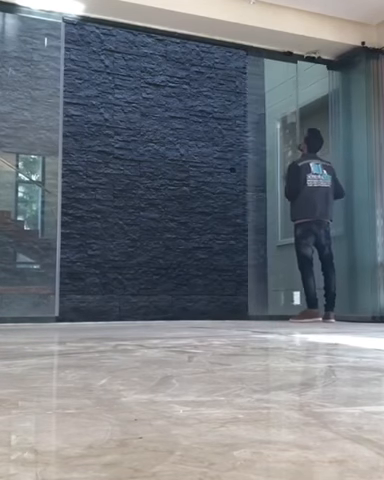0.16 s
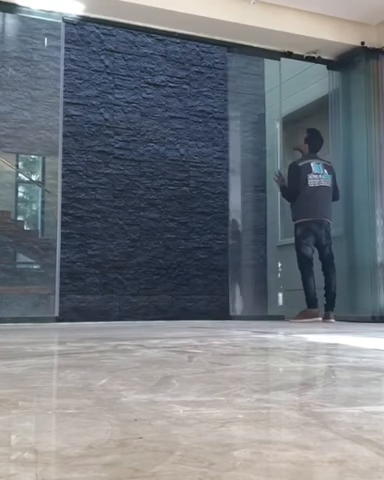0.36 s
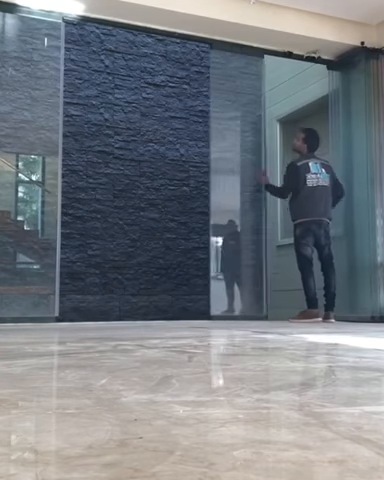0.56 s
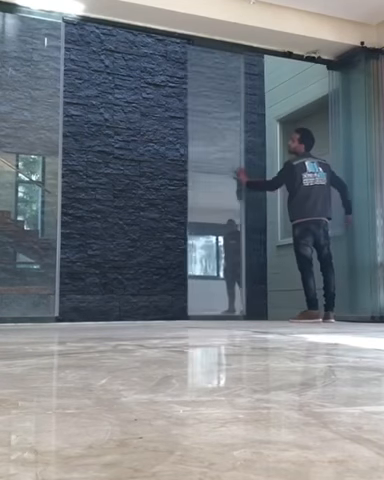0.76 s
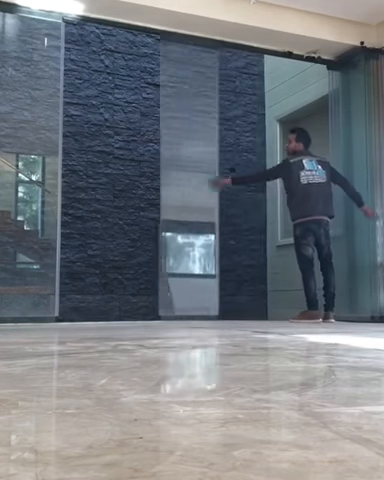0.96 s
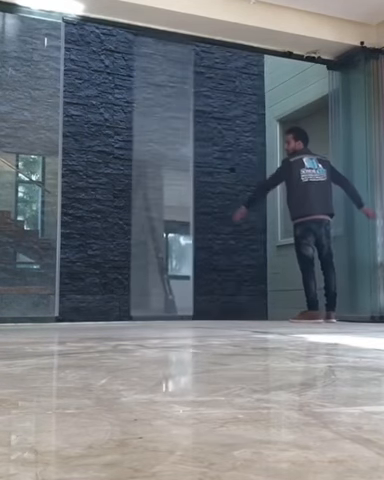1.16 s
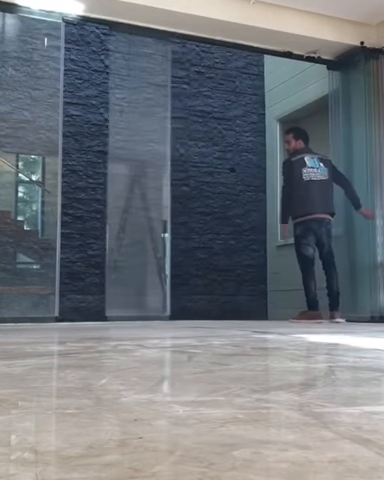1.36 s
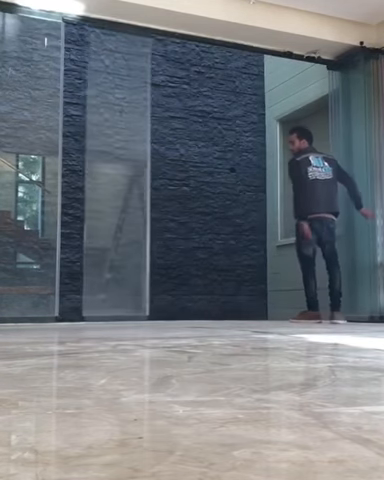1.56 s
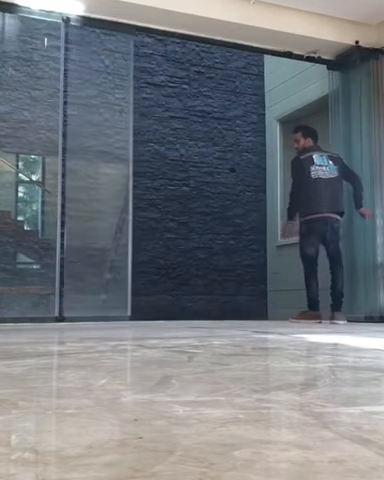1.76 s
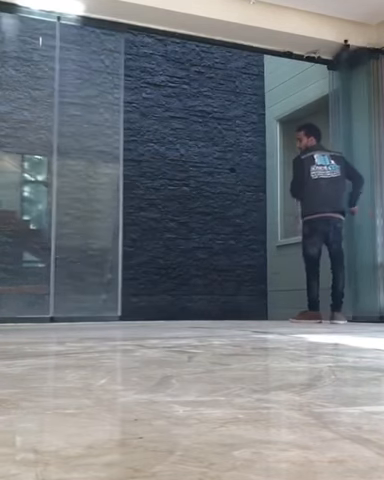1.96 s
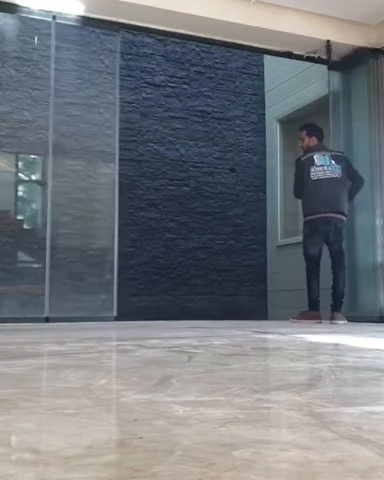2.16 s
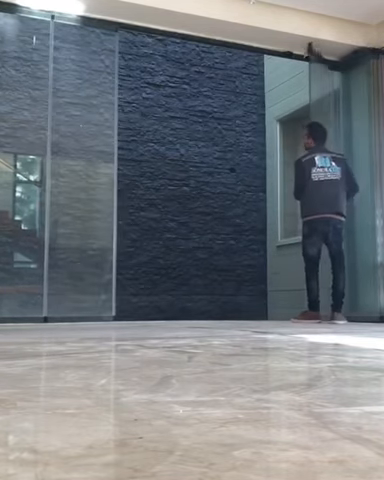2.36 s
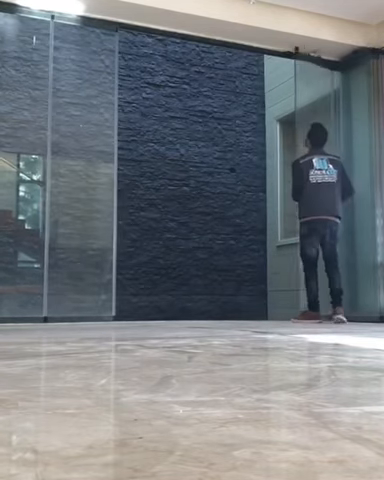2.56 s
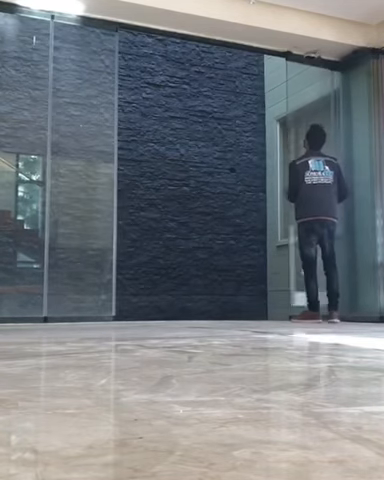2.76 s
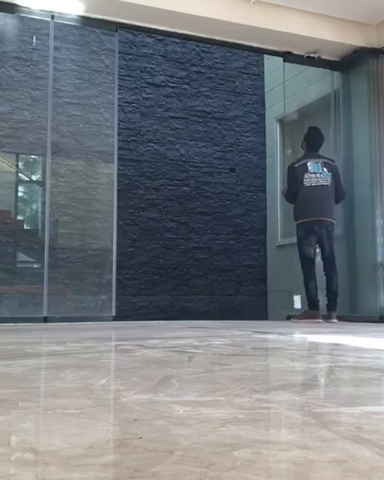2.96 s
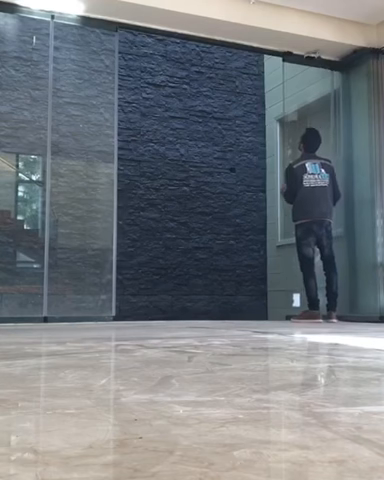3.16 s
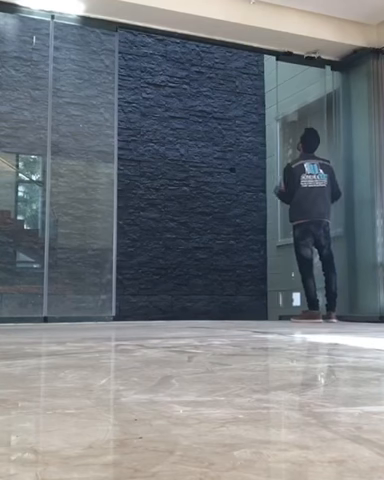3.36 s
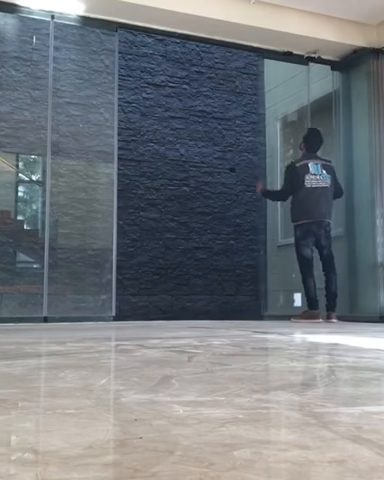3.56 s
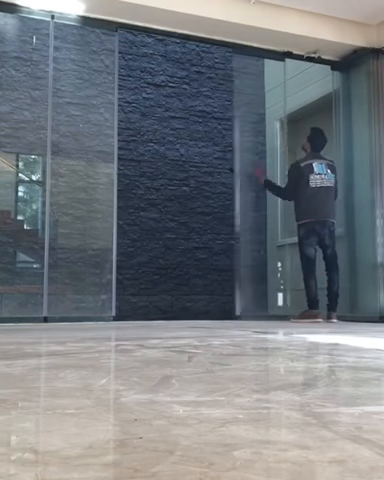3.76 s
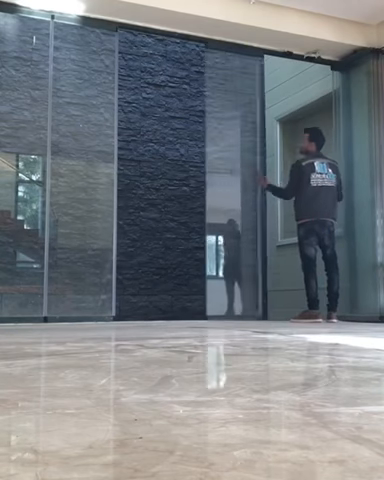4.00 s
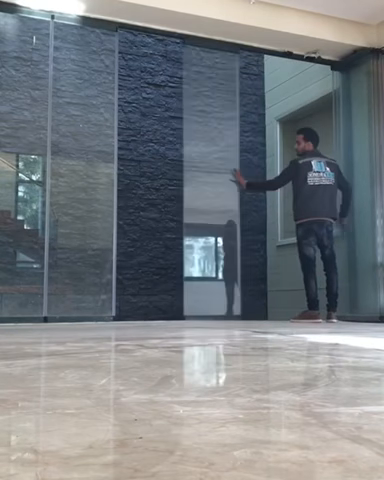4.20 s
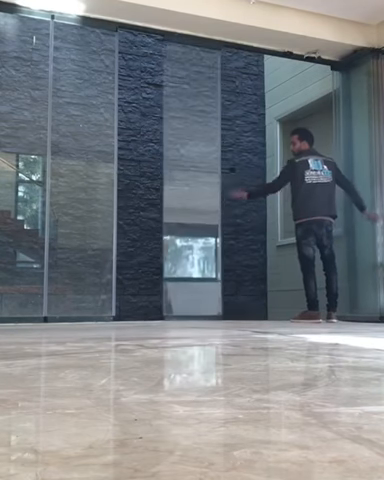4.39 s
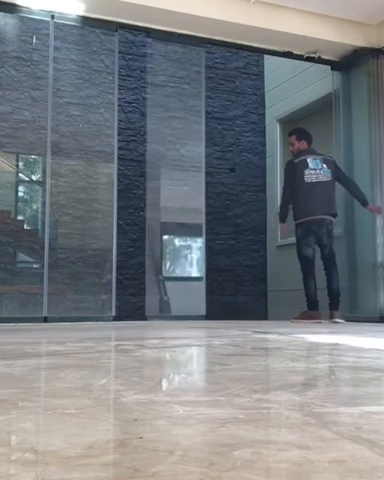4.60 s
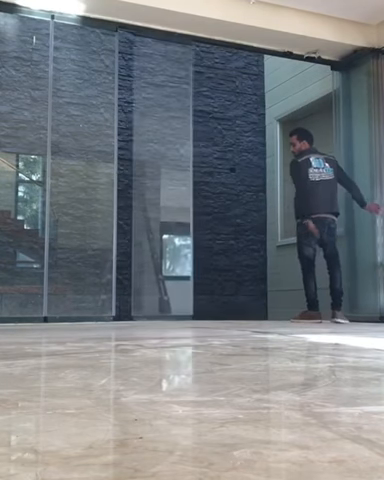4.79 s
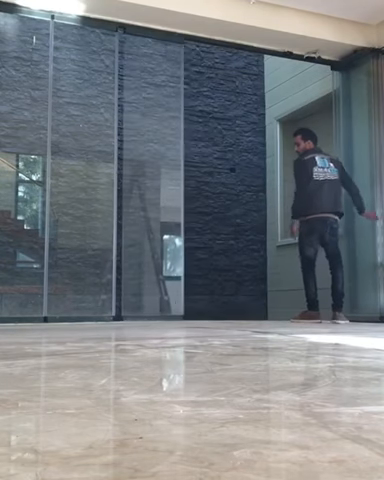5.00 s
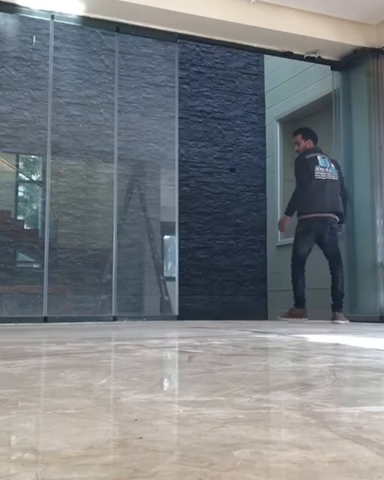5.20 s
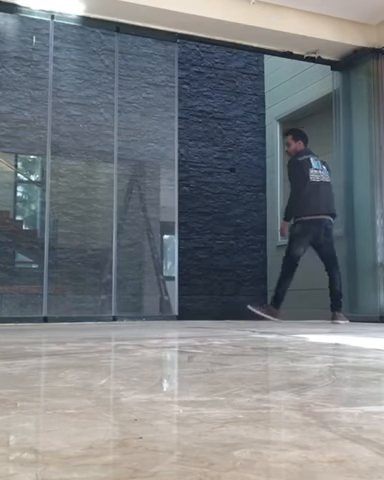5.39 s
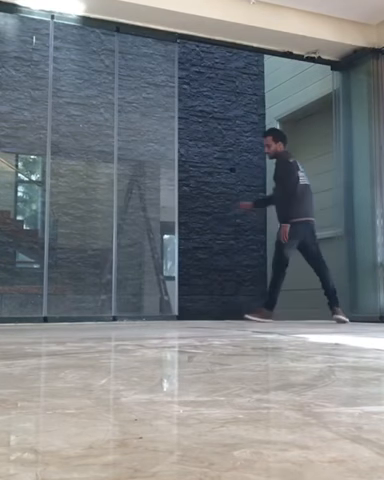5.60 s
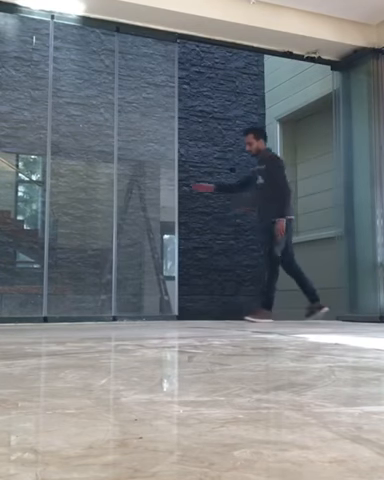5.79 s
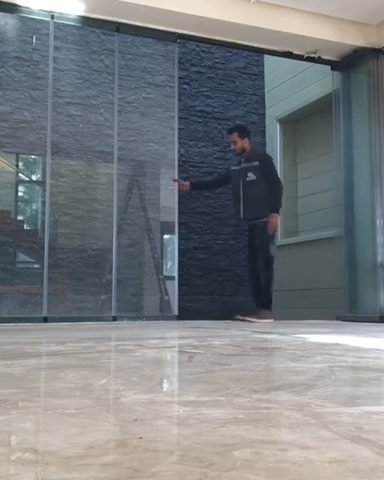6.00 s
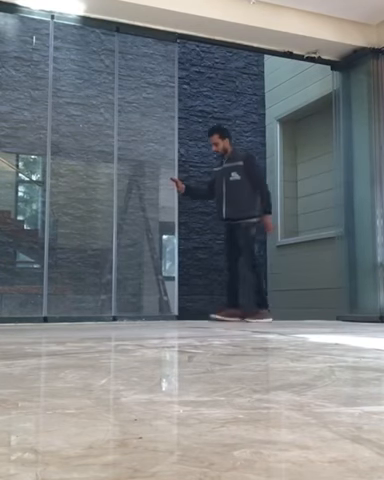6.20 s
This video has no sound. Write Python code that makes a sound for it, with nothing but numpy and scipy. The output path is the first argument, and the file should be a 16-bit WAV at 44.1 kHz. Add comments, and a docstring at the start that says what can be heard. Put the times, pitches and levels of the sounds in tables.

```python
"""Wheels rumble along a track, with scrapes, clicks and jolts: tall glass panels are being pushed
through a hard-floored hall, several metres away. The first rolls off with a faint wheel whine and
slams into the parked stack, ringing glass, frames and rails. The second coasts to a clack at the
stop, then gets another shove. Jolted panes flex and boom; the hall rings after each blow."""
import sys
import numpy as np
from scipy import signal
from scipy.fft import rfft, irfft, next_fast_len
from scipy.io import wavfile
from scipy.ndimage import map_coordinates

SR = 44100
rng = np.random.default_rng(int(sys.argv[2]) if len(sys.argv) > 2 else 0)


def generate_wav(sig):
    """Save sig (samples, or channels by samples) to the path in sys.argv[1] as 16-bit PCM at SR."""
    pcm = np.round(np.clip(np.atleast_2d(sig).T, -1, 1) * 32767).astype(np.int16)
    wavfile.write(sys.argv[1], SR, pcm)


N = 275401

# Table levels are relative.
# Pushes. Each row: start, let-go and stop in seconds, top speed in m/s, friction in m/s^2,
# then pane rumble, roller growl and track hiss in dB.
PUSHES = [(-.4, .4, 1.97, 1.38, .47, -41.5, -35.8, -60.7), (3.47, 3.87, 5.36, 1.54, 1.0, -38, -33.8, -56.5),
          (5.74, 5.86, 6.24, .9, 2.0, -41, -32, -57)]
# Brief scraping hisses. Each row: start in seconds, hiss in dB, hiss centre in Hz, sizzle in dB,
# length in seconds.
SCRAPES = [(.03, -54, 4200, -54, .17), (.23, -39, 2700, -52, .08), (.43, -35, 2250, -48, .075),
           (1.535, -48, 4600, -62, .08), (2.862, -40.5, 1650, -51, .12), (3.46, -47.5, 2900, -60, .14),
           (4.825, -37.5, 2300, -66, .1), (5.775, -44, 3200, -48, .049), (5.812, -39.5, 2100, -43, .1),
           (5.9, -44, 4200, -58, .11), (6.185, -58, 4500, -60, .053)]
# Carriage clicks. Each row: start in seconds, click in dB, ring in dB, ring in Hz, t60 in seconds.
TICKS = [(.076, -41.5, -47, 7000, .06), (.205, -35, -39, 3500, .13), (.422, -38, -28.5, 2850, .055),
         (.438, -42, -43, 9700, .05), (1.95, -46, -39, 5000, .007), (3.03, -58, -37.5, 2900, .017),
         (3.089, -54, -60, 9500, .09), (3.442, -46.5, -41, 2200, .1), (3.701, -40.5, -35.5, 3200, .05),
         (3.901, -35.5, -27.5, 2900, .02), (4.216, -53, -45, 9000, .02), (4.24, -54, -47.5, 9000, .02)]
# Double jolts. Each row: start in seconds, knock in dB, frame ring in dB, ring in Hz, t60 in seconds,
# second blow's lag in seconds, its gain in dB.
BUMPS = [(.187, -30.5, -38.5, 1300, .22, .026, 10), (.421, -24.3, -34.5, 1050, .29, .046, 3.8),
         (1.09, -23.5, -36.5, 800, .36, .045, -2), (3.029, -26.5, -28, 1080, .14, .022, -2.5),
         (3.704, -20.5, -30.5, 1000, .36, .106, -8), (3.9, -24, -44, 1200, .16, .04, -6),
         (5.362, -40, -49, 560, .25, .06, -1), (5.805, -35.5, -36, 600, .2, .066, 7)]
# Pane bending modes. Each row: start in seconds, level in dB, pitch in Hz, t60 in seconds.
BOOMS = [(.222, -22, 81.7, .45), (.482, -18.5, 67.6, .32), (.502, -32.5, 130.4, .67),
         (1.999, -32.5, 83.7, 1), (2.149, -31.5, 64, 1.5), (3.069, -27, 81.3, .66),
         (3.715, -26, 83.7, 1.05), (3.801, -25.5, 120.7, .59), (5.42, -29.5, 86.1, .5),
         (5.826, -22.5, 115, .46)]
# Bounces on the stop. Each row: start in seconds, level in dB, t60 in seconds.
STOP_BOUNCES = [(5.358, -18, 0.028), (5.3635, -18.5, 0.013), (5.37, -18.5, .015), (5.3748, -22, 0.059)]

# Resonances. Each row: centre in Hz, width in Hz, level in dB.
TRACK_MODES = [(283, 40, 2), (590, 39, 2), (2790, 67, -12.5), (2934, 47, -21)]
DRY_WHEEL_TONES = [(3677, 55, 0), (7020, 130, -10), (3570, 90, -7), (2955, 70, -7)]
RAIL_MODES = [(2178, 25, -5), (2712, 20, -5), (2907, 40, -1), (3200, 25, -3), (3981, 22, -4),
              (4118, 12, -2), (4356, 27, -3), (4546, 12, -1), (5215, 16, -4), (5632, 27, -5),
              (8106, 12, -13), (9475, 12, -19)]  # glass and its aluminium rails
FRAME_MODES = [(222.7, 20, 0.5), (396, 38, -2), (574, 18, -4)]
END_CAP_MODES = [(1540, 130, -8.5), (2640, 78, -4), (3000, 110, -0.5), (3600, 98, -2), (4500, 74, -5),
                 (5400, 110, -13)]

# Noise spectra. Each row: frequency in Hz, level in dB.
AIR_SPECTRUM = [(20, -16), (60, -1), (90, -0.5), (200, -11), (450, -23), (1500, -26.5), (3000, -39.5),
                (6000, -40), (12000, -47.5)]
PANE_SPECTRUM = [(20, -32), (32, -10), (48, -10), (62, 3.5), (82, 9), (105, 7.5), (150, -3), (300, -57)]
ROLLER_SPECTRUM = [(60, -24), (140, -2), (220, 3), (440, -11.5), (640, -8), (930, -10.5), (1300, -12),
                   (2250, -23), (2850, -26), (3700, -29.5), (4700, -42.5), (8000, -73)]
HISS_SPECTRUM = [(1000, -23), (2500, 16), (4600, -2), (5700, 11), (7500, -1), (9500, 5.5), (11500, -32),
                 (12500, -22)]
CARRIAGE_SPECTRUM = [(500, -20), (2000, -2), (4000, -1), (5000, -2), (6500, 0), (8000, -7), (10000, -4.5),
                     (12000, -10)]
KNOCK_SPECTRUM = [(40, -3.5), (100, 0.5), (230, 0.5), (300, -1.5), (440, -7), (620, -4.5), (950, -9.5),
                  (1500, -16.5), (2000, -17), (3200, -27), (6000, -40), (12000, -64)]
STACK_SPECTRUM = [(40, -10), (150, 1), (230, -2), (600, 0.5), (1100, -5), (1750, -5.5), (2800, -1.5),
                  (4400, -1.5), (4900, -6), (5700, -3.5), (6900, -13), (8400, -9), (10500, -15.5),
                  (12000, -17.5)]
STOP_SPECTRUM = [(150, -38), (400, -20), (650, -6.5), (800, -16), (1000, -7.5), (1550, -18), (1800, -6),
                 (3050, -0.5), (4100, -4.5), (4600, -8), (6500, -17), (9000, -14.5), (12000, -19.5)]

# Hall decay. Each row: frequency in Hz, t60 in seconds.
HALL_T60 = [(60, 3.3), (250, 1.55), (700, 1.98), (2000, 2), (4000, 1.69), (5500, 1.26), (8000, 0.94),
            (11000, 0.33)]


def amp(db):
    """Decibels to gain."""
    return 10 ** (np.asarray(db) / 20)


def unit_rms(x):
    """Scale to rms 1."""
    return x / np.sqrt(np.mean(x ** 2) + 1e-20)


def log_interp(points, hz):
    """Interpolate (Hz, value) points on a log axis."""
    points_hz, values = np.transpose(points)
    return np.interp(np.log(hz + 1), np.log(points_hz + 1), values)


def filtered(x, response):
    """Apply a frequency response by padded FFT."""
    size = next_fast_len(len(x) + 8192)
    return irfft(rfft(x, size) * response(np.fft.rfftfreq(size, 1 / SR)), size)[:len(x)]


def noise(response, size):
    """Coloured noise, rms 1."""
    return unit_rms(filtered(rng.standard_normal(size), response))


def colour(spectrum):
    """Response of a spectrum table."""
    return lambda hz: amp(log_interp(spectrum, hz))


def resonances(modes):
    """Response of parallel damped modes."""
    return lambda hz: sum(amp(db) * 1j * hz * width / (centre ** 2 - hz ** 2 + 1j * hz * width)
                          for centre, width, db in modes)


def hump(centre_hz, octaves):
    """Peak with wide skirts."""
    return lambda hz: 1 / (1 + (np.log2((hz + 1) / centre_hz) / octaves) ** 2)


def band(centre_hz, octaves):
    """Peak with steep sides."""
    return lambda hz: np.exp(-(np.log2((hz + 1) / centre_hz) / octaves) ** 2)


def wobble(rate_hz):
    """Smooth random curve."""
    knots = rng.standard_normal(int(N * rate_hz / SR) + 4)
    return map_coordinates(knots, [np.arange(N) * rate_hz / SR])


def add(out, start_s, sound):
    """Mix a sound in place."""
    part = out[max(round(start_s * SR), 0):][:len(sound)]
    part += sound[:len(part)]


def chatter(response, t60_s):
    """A blow's dense contacts: noise that starts at once and decays."""
    t = np.arange(SR if t60_s > .5 else SR // 2) / SR
    return noise(response, len(t)) * amp(-60 * t / t60_s) * (1 - np.exp(-t / 0.00046))


def hall(x, direct_db, wet_db):
    """Direct sound plus diffuse tail: the hall stores energy per band and loses treble first."""
    hz, t, spectra = signal.stft(x, SR, nperseg=512)
    t = t[:400]
    build_up = 1 - np.exp(-(t / 0.0047) ** 2)  # echoes thicken as more walls answer
    store = amp(-120 * t / log_interp(HALL_T60, hz)[:, None]) * build_up
    store /= store.sum(1, keepdims=True)
    energy = signal.fftconvolve(np.abs(spectra) ** 2, store, axes=1)[:, :spectra.shape[1]]
    diffuse = signal.stft(rng.standard_normal(N), SR, nperseg=512)[2]
    tail = signal.istft(np.sqrt(np.abs(energy)) * diffuse / np.std(diffuse), SR, nperseg=512)[1][:N]
    return amp(direct_db) * x + amp(wet_db) * tail


def travel(start_s, let_go_s, stop_s, top_m_s, friction_m_s2):
    """Push, then coast: speed, distance rolled and a gain that fades after the stop."""
    t = np.arange(N) / SR
    pushed = np.clip((t - start_s) / (let_go_s - start_s), 0, 1)
    coasted_s = np.clip(t - let_go_s, 0, stop_s - let_go_s)
    speed_m_s = np.maximum(top_m_s * pushed - friction_m_s2 * coasted_s, 0)
    place_m = np.cumsum(speed_m_s * (t < stop_s)) / SR
    linger = amp(-70 * np.maximum(t - stop_s, 0))
    return speed_m_s, place_m, linger


def dryness(place_m, from_m=1.39, onset_m=.045, fade_db_per_m=23):
    """Track dryness, 0-1: sets in quickly, fades with distance."""
    past_m = place_m - from_m
    return (1 + np.tanh(past_m / onset_m)) / 2 * amp(-fade_db_per_m * np.maximum(past_m, 0))


def hall_air():
    """The hall's quiet, steady rumble."""
    return amp(-42) * noise(colour(AIR_SPECTRUM), N)


def rolling(gritty_at_m=1.47, gritty_width_m=.42, dry_growl_db=3.5):
    """Wheels on grit growl, hiss, ring the track and shake the pane, louder at speed."""
    rumble_gain, growl_gain, hiss_gain = np.zeros((3, N))
    for *motion, rumble_db, growl_db, hiss_db in PUSHES:
        speed_m_s, place_m, linger = travel(*motion)
        gritty_db = 6.7 * np.exp(-((place_m - gritty_at_m) / gritty_width_m) ** 2)
        rumble_gain += linger * amp(rumble_db) * speed_m_s ** 1.15
        growl_gain += linger * amp(growl_db + dry_growl_db * dryness(place_m)) * speed_m_s ** 1.5
        hiss_gain += linger * amp(hiss_db + gritty_db) * speed_m_s ** .9
    grit = amp(1.2 * wobble(300))
    rumble = noise(colour(PANE_SPECTRUM), N) * amp(1)
    growl = unit_rms(filtered(grit * rng.standard_normal(N), colour(ROLLER_SPECTRUM)))
    growl *= amp(1 + 0.48 * wobble(14))
    track_ring = noise(resonances(TRACK_MODES), N) * amp(-7 + 1.4 * wobble(6.6))
    hiss = unit_rms(grit * noise(colour(HISS_SPECTRUM), N)) * amp(-3.5)
    return rumble_gain * rumble + growl_gain * (growl + track_ring) + hiss_gain * hiss


def scrapes():
    """Brief scraping hisses: shoe scuffs, a panel starting to move, rattly hiss after jolts."""
    out = np.zeros(N)
    for start_s, hiss_db, hiss_hz, sizzle_db, length_s in SCRAPES:
        stroke = np.sqrt(np.abs(np.hanning(int(length_s * SR))))
        add(out, start_s, amp(hiss_db) * stroke * noise(hump(hiss_hz, octaves=0.54), len(stroke)))
        add(out, start_s, amp(sizzle_db) * stroke * noise(hump(6500, octaves=0.4), len(stroke)))
    return hall(out, direct_db=-2, wet_db=-4.5)


def carriage_ticks():
    """Roller carriages click along the track, each with a short metal ring."""
    blows = np.zeros(N)
    for start_s, click_db, ring_db, ring_hz, t60_s in TICKS:
        add(blows, start_s, amp(click_db) * chatter(colour(CARRIAGE_SPECTRUM), t60_s))
        add(blows, start_s, amp(ring_db) * chatter(hump(ring_hz, octaves=0.11), t60_s))
    return hall(blows, direct_db=3.5, wet_db=-0.5)


def panel_bumps():
    """Track joints and shoves jolt the hanging panel: dull double knocks, hollow frame ring."""
    blows = np.zeros(N)
    for start_s, knock_db, ring_db, ring_hz, t60_s, lag_s, second_db in BUMPS:
        for at_s, gain in ((start_s, 1), (start_s + lag_s, amp(second_db))):
            add(blows, at_s, gain * amp(knock_db) * chatter(colour(KNOCK_SPECTRUM), t60_s))
            add(blows, at_s, gain * amp(ring_db) * chatter(band(ring_hz, octaves=0.55), t60_s))
    return hall(blows, direct_db=-0.5, wet_db=0.5)


def pane_booms(swell_s=0.033, drift_hz=20):
    """A pane's low bending modes swell after a jolt and waver as they die."""
    out, t = np.zeros(N), np.arange(SR) / SR
    for start_s, db, hz, t60_s in BOOMS:
        drift_rad = .5 * map_coordinates(rng.standard_normal(24), [t * drift_hz])
        envelope = (1 - np.exp(-t / swell_s)) * amp(db + 7.5 - 60 * t / t60_s)
        add(out, start_s, envelope * np.sin(2 * np.pi * hz * t + drift_rad))
    return out


def wheel_whine(flutter_db=3):
    """On dry track a wheel rubs its housing and sings in narrow, unsteady tones, louder at speed."""
    gain = np.zeros(N)
    for push in PUSHES:
        speed_m_s, place_m, linger = travel(*push[:5])
        gain += linger * dryness(place_m) * speed_m_s ** 1.45
    tones = lambda hz: sum(amp(db) * np.exp(-((hz - centre) / width) ** 2)
                           for centre, width, db in DRY_WHEEL_TONES)
    return gain * amp(-45.3 + flutter_db * wobble(25)) * noise(tones, N)


def stack_slam(start_s=1.9722, contacts=7):
    """The slam runs through the stack pane by pane, each contact weaker, duller and longer."""
    blows, rails, frame = np.zeros((3, N))
    at_s = start_s
    for k in range(contacts):
        tilt_db_per_octave = 1 - .3 * k
        tilted = [(hz, db + tilt_db_per_octave * np.log2(hz)) for hz, db in STACK_SPECTRUM]
        add(blows, at_s, amp(-8.6 - .4 * k) * chatter(colour(tilted), t60_s=.026 * 1.24 ** k))
        at_s += .0066 * 1.14 ** k  # gaps widen
    add(rails, start_s, amp(-19.5) * chatter(resonances(RAIL_MODES), t60_s=1.16))
    add(frame, start_s, amp(-23) * chatter(resonances(FRAME_MODES), t60_s=1.63))
    return hall(blows, direct_db=2, wet_db=3) + rails + frame


def stop_clack():
    """The slowed panel bounces on the stop, whose end cap rings."""
    blows, ring = np.zeros((2, N))
    for start_s, db, t60_s in STOP_BOUNCES:
        add(blows, start_s, amp(db) * chatter(colour(STOP_SPECTRUM), t60_s))
    add(ring, STOP_BOUNCES[0][0], amp(-27) * chatter(resonances(END_CAP_MODES), t60_s=0.78))
    return hall(blows, direct_db=2, wet_db=1.5) + ring


def scene():
    """All sources, mono."""
    running = hall_air() + rolling() + scrapes() + carriage_ticks() + panel_bumps() + pane_booms()
    return (running + wheel_whine() + stack_slam() + stop_clack())[None]


def record(dry, ceiling=.95, low_cut_hz=42, top_hz=11850):
    """The microphone rounds the highest peaks and loses deep bass and top treble."""
    rounded = dry[0] / (1 + np.abs(dry[0] / ceiling) ** 6) ** (1 / 6)
    thinned = signal.sosfilt(signal.butter(3, low_cut_hz, "high", fs=SR, output="sos"), rounded)
    return filtered(thinned, lambda hz: 1 / np.sqrt(1 + (hz / top_hz) ** 190))[None]


dry = scene()
out = record(dry)
generate_wav(out)
```